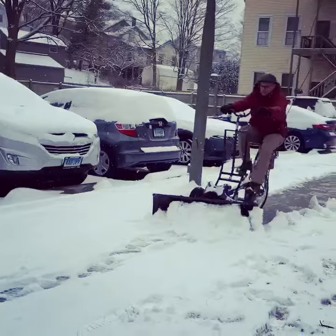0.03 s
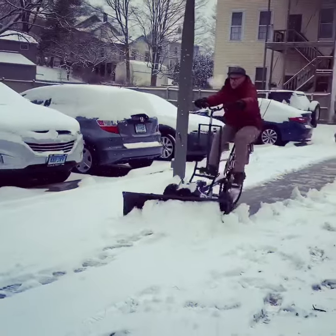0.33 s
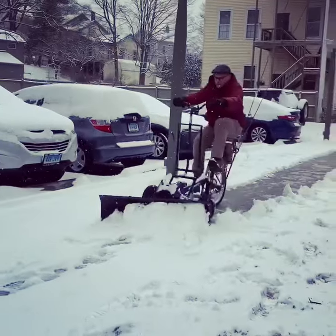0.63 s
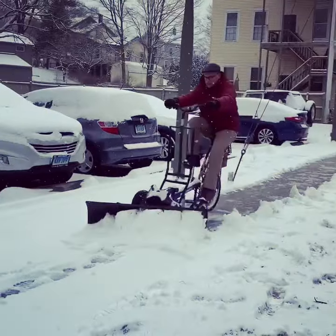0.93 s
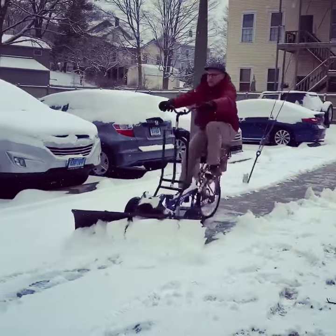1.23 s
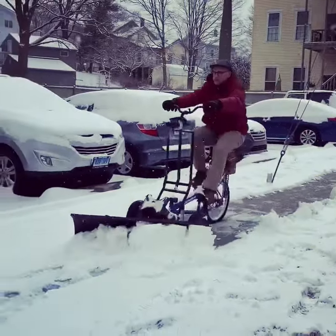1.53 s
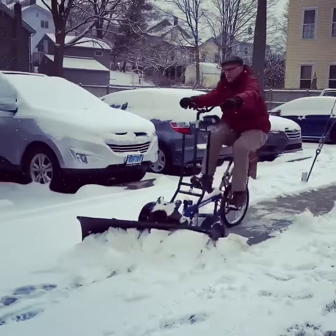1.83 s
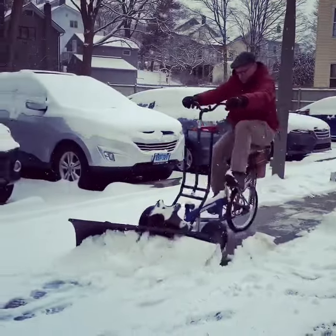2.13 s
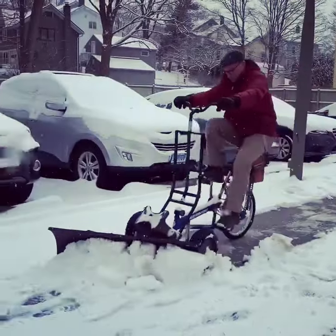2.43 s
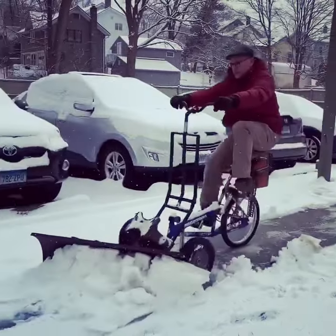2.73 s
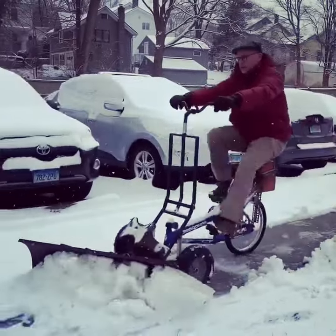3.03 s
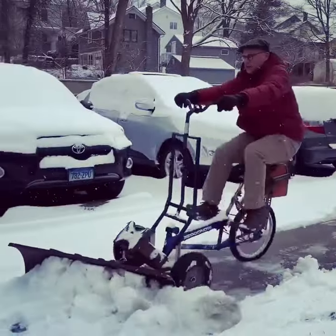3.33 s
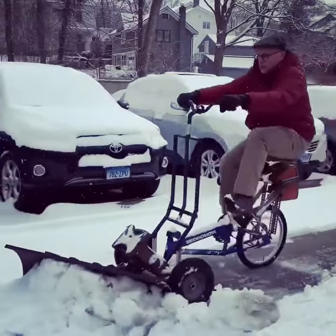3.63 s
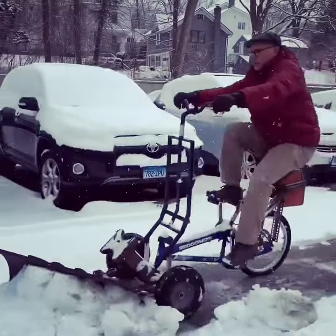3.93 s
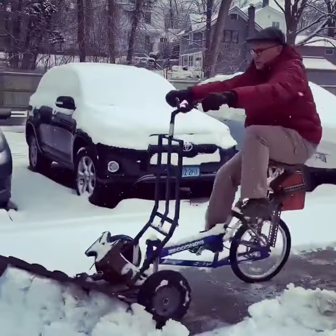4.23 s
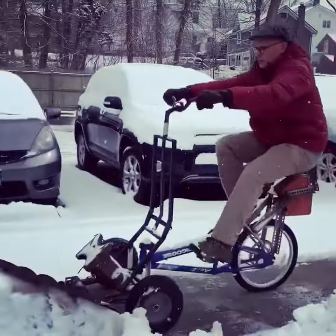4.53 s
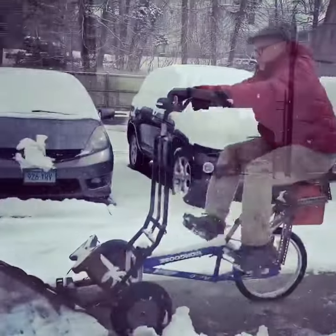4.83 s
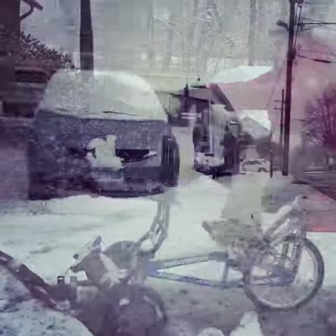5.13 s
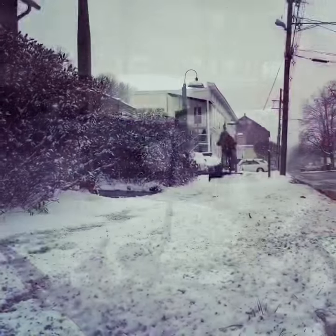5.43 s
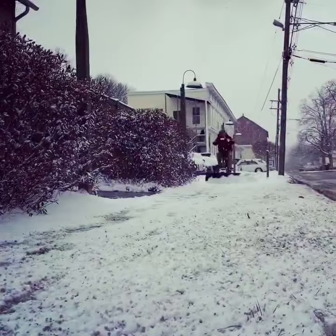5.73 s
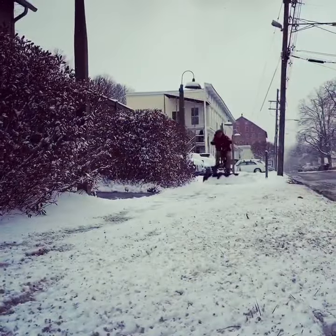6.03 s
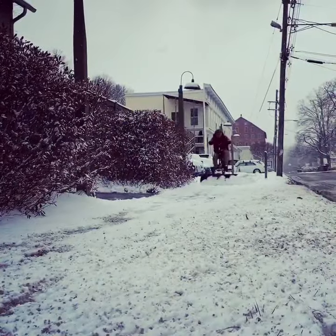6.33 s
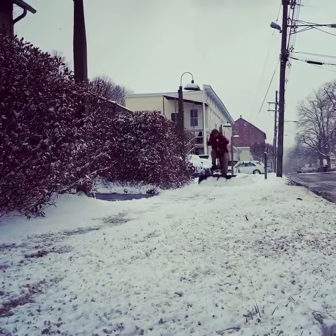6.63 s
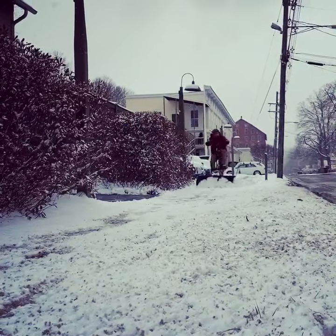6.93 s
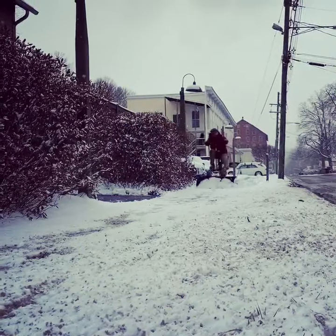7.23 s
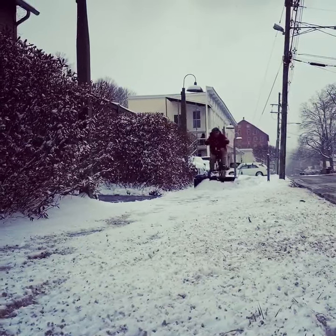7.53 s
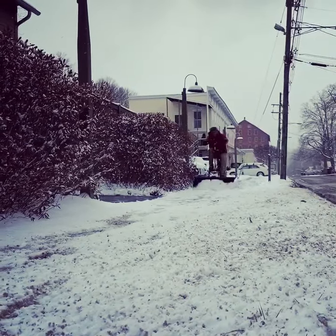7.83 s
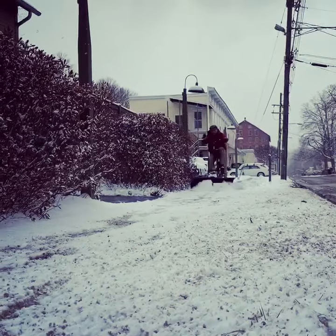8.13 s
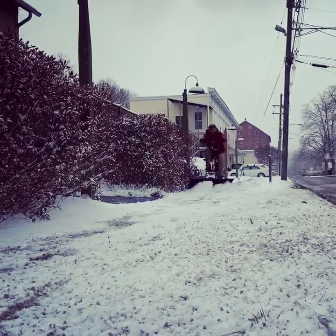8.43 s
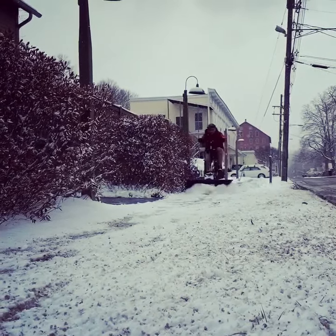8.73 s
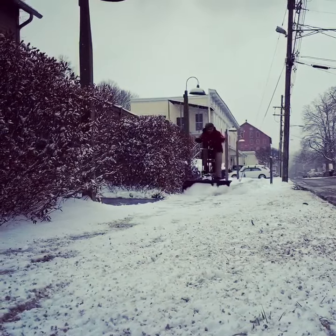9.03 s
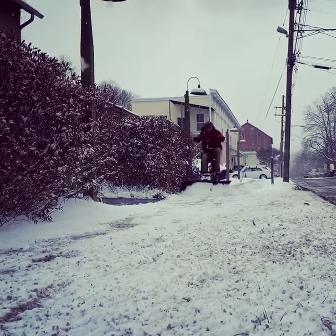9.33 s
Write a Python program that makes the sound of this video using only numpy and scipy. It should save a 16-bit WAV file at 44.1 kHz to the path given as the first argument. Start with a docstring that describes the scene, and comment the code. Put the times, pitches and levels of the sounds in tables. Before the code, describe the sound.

A steel plow blade is pedalled along snowy pavement near the microphone, booming and rasping in uneven surges. Its edge clacks, catches and grates while packed snow crunches, above a low rumble and a faint engine. About halfway the blade goes by and the sound blends into a distant view of the street: an idling hum, soft knocks and a gritty hiss that grows as the plow nears.

```python
"""First a pedal-driven plow pushes snow along a pavement close by, over a low rumble and a faint engine.
With each push its steel blade shudders and booms, its edge scrapes, and the snow crunches and hisses.
Soon grit snaps, and the edge clacks, groans, catches and grates. Just after 4 seconds the blade passes.
Around 5 seconds the sound fades over to the same plow far down the street, where an engine idles.
From there to the end, the plow slowly comes nearer."""
import sys
import numpy as np
from scipy import signal
from scipy.fft import irfft
from scipy.io import wavfile
from scipy.ndimage import uniform_filter1d

SR = 44100
rng = np.random.default_rng(int(sys.argv[2]) if len(sys.argv) > 2 else 0)


def write(x):
    x = np.atleast_2d(x).T
    wavfile.write(sys.argv[1], SR, np.round(np.clip(x, -1, 1) * 32767).astype(np.int16))


N = 422919
T = np.arange(N) / SR
FILTER_HZ = np.fft.rfftfreq(4096, 1 / SR)

# The low rumble of air and street. Each row: time in seconds, level in dB.
RUMBLE_LEVELS = [(0.0, -34), (0.48, -25.5), (0.7, -34), (4.0, -39), (4.5, -33.5), (5.45, -31.5),
                 (6.06, -33.5), (9.59, -48)]
# The tone of each noise. Each row: frequency in Hz, strength in dB.
RUMBLE_TONE = [(10, 14), (25, -20), (50, 25.5), (70, 14), (90, 16), (140, 14.5), (300, -67)]
SCRAPE_TONE = [(300, -34), (600, -13), (950, -7.5), (1200, 1.5), (1600, -3.5), (1900, -2.5), (2350, -7),
               (2800, -3), (3400, -12), (4300, -3), (5300, -8), (7000, -67), (15000, -22)]
SNOW_TONE = [(1500, -25), (3300, -3), (4700, -.5), (5700, -2.5), (6600, 2), (7600, -1), (9100, 2),
             (10500, -.5), (12000, -6), (14000, -9), (15500, -12)]
PASSING_SNOW_TONE = [(1500, -20), (3200, 0), (4800, 2.5), (6000, -.5), (7000, .5), (9000, -3.5),
                     (11000, -2.5), (13000, -6), (15500, -12)]
FAR_SNOW_TONE = [(300, -11), (1000, -1), (1500, -2), (2900, -.5), (4200, -4), (5000, -1.5), (7000, 0),
                 (8500, 0), (9400, -3.5), (10700, -1.5), (12500, -7), (13500, -14), (15500, -19)]
# A faint, fast engine nearby and a slower one down the street. Each row: pitch in Hz, level in dB.
PARKED_ENGINE = [(63, -41), (94.5, -38)]
STREET_ENGINE = [(49.6, -32.5), (74.5, -28.5), (124, -37.5)]
# The blade's low boom, the higher ring of its steel plate, and bright peaks in the far hiss.
# Each row: pitch in Hz, width in Hz (narrow rings longer), strength in dB.
BOOM_NOTES = [(67, 15, -26), (147.2, 40, -6.5), (219.5, 66, 0.5), (291.5, 77, -4.5)]
PLATE_NOTES = [(557, 147, -0.5), (660, 310, -5.5), (725, 137, 1), (796, 35, -7.5)]
FAR_BOOM_NOTES = [(111, 23, -3), (187, 89, 0), (269, 74, -6)]
FAR_PLATE_NOTES = [(381, 160, -5), (516, 100, -1.5), (569, 67, 1.5), (693, 100, -10), (965, 123, -15)]
FAR_HISS_PEAKS = [(2330, 200, -3), (5240, 240, -3), (5620, 240, -2), (6140, 220, 2), (6740, 350, -2),
                  (7380, 220, 0), (8230, 300, -2), (8560, 200, -4)]
# The near blade between pushes. Each row: time in seconds, then boom, ring, scrape and hiss in dB.
GLIDE_LEVELS = [(0.1, -23, -36, -37.5, -40.5), (0.9, -20, -34.5, -37, -41), (1.5, -19, -33, -37, -44),
                (2.3, -21, -35.5, -34.5, -39), (3.3, -20.5, -35.5, -33, -39.5), (4.0, -20, -35.5, -36, -41),
                (4.6, -23.5, -32.5, -31, -37), (4.9, -24, -33.5, -35, -41), (5.5, -24, -31, -34.5, -40)]
# Pedal pushes drive the blade in. Each row: start and length in seconds, extra boom and scrape in dB.
NEAR_PUSHES = [(0.08, 0.21, 6.5, 3), (0.33, 0.26, 5, 3.5), (0.68, 0.4, 2.5, 3), (1.24, 0.36, 4.5, 2.5),
               (1.53, 0.27, 6, 1.5), (1.9, 0.31, 4.5, 1), (2.245, 0.27, 2, 3.5), (2.5, 0.23, 1.5, 2.5),
               (2.69, 0.19, 5.5, 3.5), (3.02, 0.22, 8, 5), (3.4, 0.24, 5, 6), (3.61, 0.45, 5.5, 3.5),
               (4.12, 0.29, 4, 1), (4.33, 0.52, 8, 2.5), (4.97, 0.12, 8, 3.5)]
# The scraping edge sings. Each row: time in seconds, lower and upper pitch in Hz.
EDGE_PITCHES = [(0.12, 1450, 1920), (0.99, 1350, 1920), (1.93, 1350, 1720), (2.52, 1480, 1850),
                (3.3, 1330, 2030), (3.5, 1390, 2100), (4.08, 1400, 2200), (4.61, 1350, 2280),
                (5.2, 1440, 2330)]
# Grit snaps. Each row: start in seconds, peak in dB, pitch in Hz, fade time in milliseconds.
GRIT_SNAPS = [(0.177, -16, 8350, 3.3), (1.025, -20, 7500, 3), (1.391, -18, 9100, 4),
              (1.4818, -16, 9050, 4.7), (1.623, -15, 9700, 3.6), (1.779, -19.5, 9370, 2.8),
              (1.847, -18, 9050, 3), (2.502, -15, 8860, 2.9), (2.956, -21, 9100, 2.7),
              (3.148, -16, 9670, 3), (3.259, -15, 8450, 5.9), (3.582, -16.5, 7600, 2),
              (3.643, -16, 7190, 2), (3.668, -13, 7200, 1.4), (3.952, -16, 8250, 6),
              (6.195, -22, 7310, 1.7), (6.745, -21, 7280, 2), (7.59, -19, 7310, 3.6),
              (8.276, -20, 7310, 1.5), (8.472, -16, 6300, 3.2), (9.1028, -18, 7380, 2),
              (9.5555, -17, 6060, 4)]
# The edge hits a joint or stone, catches, or tears over a rough spot.
# Each row: start in seconds, level in dB.
EDGE_CLACKS = [(0.301, -14), (0.346, -18), (0.879, -13.5), (1.026, -14), (1.082, -18.5), (1.146, -18),
               (1.228, -14), (1.847, -18.5), (2.261, -13.5), (2.723, -15), (4.8, -18), (6.05, -26),
               (7.153, -24), (7.265, -30), (7.338, -35)]
BLADE_KNOCKS = [(0.684, -12), (2.202, -5), (2.358, -6.5), (2.516, -13), (4.056, -4), (4.196, -9),
                (6.087, -12), (7.375, -10), (7.997, -13), (8.202, -16), (8.967, -9)]
EDGE_GRATES = [(1.618, -17), (1.979, -21), (2.283, -19), (2.383, -20), (2.483, -18.5), (2.635, -18.5),
               (2.815, -19.5), (3.435, -18.5), (3.638, -20)]
# Packed snow breaks, or the blade hops clear. Each row: start and length in seconds, hiss change in dB.
SNOW_CRUNCHES = [(0.45, 0.12, 2.5), (0.72, 0.26, 2.5), (1.24, 0.32, 6), (1.58, 0.2, 5), (1.91, 0.29, 2.5),
                 (3.09, 0.087, 3), (3.425, 0.13, 6), (3.77, 0.24, 4), (3.93, 0.11, 5.5), (4.42, 0.37, 1),
                 (6.12, 0.072, 2.5), (7.81, 0.17, 3), (9.25, 0.064, 4), (9.42, 0.055, 6)]
BLADE_HOPS = [(2.16, 0.1, -8), (5.09, 0.11, -1), (6.6, 0.11, -2.5), (8.22, 0.08, -3)]
# The blade groans. Each row: start and length in seconds, first and last pitch in Hz, level in dB.
BLADE_GROANS = [(0.616, 0.83, 715, 715, -35.5), (0.78, 0.28, 557, 570, -35), (1.26, 0.44, 252, 202, -18),
                (1.9, 0.2, 1290, 1230, -35), (1.97, 0.18, 236, 207, -16), (2.299, 0.55, 1490, 1400, -34.5),
                (2.682, 0.18, 293, 296, -22.5), (3.04, 0.18, 236, 210, -20.5),
                (3.2, 0.32, 1260, 1180, -34.5), (3.46, 0.56, 257, 199, -23), (3.65, 1.21, 1170, 1190, -37),
                (4.147, 0.21, 650, 654, -34), (4.35, 0.47, 194.3, 218.3, -17.5),
                (4.567, 0.44, 746, 727, -33.5), (4.76, 0.44, 1490, 1430, -39),
                (5.548, 0.585, 334, 343, -36.5), (7.2, 0.28, 504, 520, -40)]
# Pushes far away. Each row: start and length in seconds, extra boom, ring and hiss in dB.
DISTANT_PUSHES = [(5.6, 0.23, 3.5, 1, 3), (6.21, 0.18, 3, 1, 3), (6.7, 0.15, 4, 2.5, 0.5),
                  (7.11, 0.19, 4, 6.5, 2.5), (7.31, 0.24, 2, 4, 1.5), (7.5, 0.23, 4.5, 3, 2),
                  (7.84, 0.26, 1, 3.5, 0.5), (8.6, 0.46, 3, 2.5, 3), (9.07, 0.17, 2, 4.5, 5),
                  (9.5, 0.2, 0, 4.5, 2.5)]
# How far the left side runs ahead of the right. Each row: frequency in Hz, lead in radians.
NEAR_LEFT_LEAD = [(0, 0), (300, .06), (1000, .95), (1400, .2), (2000, .3), (4000, 2.2), (5900, 3.14),
                  (11300, 9.42), (15700, 14.5)]
FAR_LEFT_LEAD = [(0, 0), (300, .06), (450, .35), (1250, -.8), (2500, 1.1), (3600, 1.8), (4800, 3.14),
                 (15200, 18.5)]
# How much louder the left side is, close by. Each row: frequency in Hz, extra level in dB.
NEAR_LEFT_BOOST = [(60, -1), (120, 0.5), (240, 0.5), (480, 1.4), (950, 2), (1890, 0)]
# How alike the two sides are. Each row: frequency in Hz, likeness from 0 to 1.
SIDE_LIKENESS = [(250, .999), (600, .97), (1800, .88), (2600, .76), (4000, .82), (5000, .985), (11500, .98),
                 (15000, .92)]

# Each pair: start and end in seconds.
FADE_IN, DRAWS_LEVEL, TURNS_AWAY = (0.036, 0.09), (3.2, 4.301), (4.8, 5.399)
ENGINE_IN, NEAR_TO_FAR = (4.7, 6.2), (4.84, 5.605)
# The far blade between pushes. Each pair: dB at the end of NEAR_TO_FAR, dB gained per second.
FAR_BOOM_RISE, FAR_RING_RISE, FAR_HISS_RISE = (-26.5, 1), (-42, 0.68), (-47.5, 2.02)


def amp(db):
    """Turns decibels into a number to multiply by."""
    return np.exp(np.asarray(db) * (np.log(10) / 20))


def evened(x):
    """Scales a signal so its average level (rms) is 1."""
    return x / np.sqrt(np.mean(x ** 2) + 1e-20)


def curves(rows):
    """Joins the dots of a table over time, one curve per column."""
    s, *columns = np.transpose(rows)
    return [np.interp(T, s, column) for column in columns]


def by_frequency(rows):
    """Joins the dots of a table over frequency, with octaves evenly spaced."""
    hz, value = np.transpose(rows)
    return np.interp(np.log(FILTER_HZ + 1), np.log(hz + 1), value)


def add(mix, s, sound):
    """Adds a sound to the mix, starting at s seconds."""
    part = mix[max(round(s * SR), 0):][:len(sound)]
    part += sound[:len(part)]


def peaks(notes):
    """A filter shape with a steep peak at each ringing note."""
    powers = (amp(db) ** 2 / (1 + (2 * (FILTER_HZ - hz) / width) ** 2) ** 2 for hz, width, db in notes)
    return np.sqrt(sum(powers))


def colour(x, gain):
    """Filters a sound so that each hit rings after it lands, never before."""
    log_gain = np.log(np.maximum(np.r_[gain, gain[-2:0:-1]], 1e-5))
    taps = np.fft.ifft(np.exp(np.conj(signal.hilbert(log_gain)))).real
    return signal.oaconvolve(x, taps[None], axes=1)[:, :N]


def wander(rate):
    """A random curve that turns about rate times a second."""
    knots = rng.standard_normal(8000)
    return evened(np.interp(T * rate, np.arange(len(knots)), knots))


def grains(per_s, spread_db):
    """Two streams of random clicks of uneven size."""
    size, chance = rng.random((2, 2, N), dtype=np.float32)
    hit, out = chance < per_s / SR, np.zeros((2, N))
    sign = np.where(chance[hit] < .5 * per_s / SR, 1, -1)
    out[hit] = sign * amp(spread_db * np.minimum(-np.log1p(-size[hit]), 4))
    return evened(out)


def clumps(per_s, decay_ms, size):
    """A loudness curve for snow giving way in lumps: each jumps up and dies away."""
    starts = np.minimum(rng.exponential(1, N), 2.4) ** 2 * (rng.random(N) < per_s / SR)
    lumps = signal.lfilter([1], [1, -np.exp(-1000 / (decay_ms * SR))], starts)
    return np.sqrt(1 + abs(size * uniform_filter1d(lumps, size=150)))


def stereo(pair, lead, boost=((0, 0),)):
    """Makes left and right: both share the first signal, and the second sets them apart."""
    same = np.clip(by_frequency(SIDE_LIKENESS), -1, 1)
    tilt = amp(by_frequency(boost) / 2) * np.exp(.5j * np.interp(FILTER_HZ, *np.transpose(lead)))
    common, apart = np.sqrt((1 + same) / 2), np.sqrt((1 - same) / 2)
    gains = np.array([[common * tilt, apart * tilt], [common / tilt, -apart / tilt]])
    taps = np.fft.fftshift(irfft(gains), axes=-1)
    return signal.oaconvolve(pair[None], taps, axes=2).sum(1)[:, taps.shape[2] // 2:][:, :N]


def steady(x, band_hz, size=4000, channels=2):
    """Keeps the level inside one band near 1, so a curve can set the loudness later."""
    band = signal.sosfilt(signal.butter(3, band_hz, "bandpass", fs=SR, output="sos"), x[:channels].mean(0))
    power = uniform_filter1d(uniform_filter1d(band ** 2, size), size // 2)
    return x / np.sqrt(abs(power) + 1e-14)


def resonate(x, hz, width):
    """Makes a sound ring at hz, which is one pitch or a sliding curve."""
    turn = np.exp(2j * np.pi * np.cumsum(np.broadcast_to(hz, x.shape[-1])) / SR)
    decay = np.exp(-np.pi * width / SR)
    return 2 * (turn * signal.lfilter([1 - decay], [1, -decay], x / turn)).real


def struck(notes, t):
    """Steel after one hit: its notes ring together and die away."""
    ring = sum((-1) ** k * amp(db) * np.sin(2 * np.pi * hz * t) * np.exp(-np.pi * width * t)
               for k, (hz, width, db) in enumerate(notes))
    return ring / abs(ring).max()


def echoes(x, share, drift_ms):
    """Short echoes off the frame and ground shift as the plow moves."""
    out = x.copy()
    for delay_ms in np.geomspace(1.3, 11, 6):
        late = T - (delay_ms + drift_ms * wander(rate=1.5)) / 1000
        out += share * rng.choice([-1, 1]) * x.take((late * SR).astype(int), axis=1, mode="clip")
    return out


def street_rumble():
    """Air and street make a deep noise that swells and sinks."""
    level_db, = curves(RUMBLE_LEVELS)
    return amp(level_db) * evened(colour(rng.standard_normal((1, N)), amp(by_frequency(RUMBLE_TONE))))


def engine_hum(tones):
    """An idling engine hums a few low, slightly wavering tones."""
    return sum(amp(db + 0.39 * wander(rate=6.4)) * np.sqrt(2)
               * np.sin(2 * np.pi * hz * T + 0.082 * wander(rate=3.14)) for hz, db in tones)


def blade_boom(jolt):
    """Many tiny jolts keep the blade's low notes booming."""
    boom = colour(grains(per_s=700, spread_db=0.5) * amp(2 * jolt), peaks(BOOM_NOTES))
    return steady(boom, band_hz=(130, 380), size=2400, channels=1)


def plate_ring(jolt):
    """Jolts ring the steel plate, and the changing load of snow bends all its notes together."""
    ring = colour(grains(per_s=1500, spread_db=4) * amp(1.1 * jolt), peaks(PLATE_NOTES))
    shift = signal.lfilter([1], [1, -np.exp(-2 / SR)], .035 * wander(rate=9))  # samples early or late
    bent = np.array([np.interp(np.arange(N) + shift, np.arange(N), side) for side in ring])
    return steady(echoes(bent, share=.23, drift_ms=.2), band_hz=(480, 880), channels=1)


def edge_scrape(jolt):
    """The edge rasps through grit and sings at two rough pitches that slide with the load."""
    lower_hz, upper_hz = curves(EDGE_PITCHES)
    rasp = grains(per_s=12000, spread_db=1.5) * amp(1.2 * jolt)
    rasp *= clumps(per_s=100, decay_ms=6.2, size=.5) ** 0.9
    singing = 1.1 * resonate(rasp, lower_hz + 85 * wander(rate=13), width=190)
    singing += 0.93 * resonate(rasp, upper_hz + 150 * wander(rate=13), width=440)
    scrape = colour(0.86 * rasp + singing, amp(by_frequency(SCRAPE_TONE)))
    scrape = echoes(scrape, share=.23, drift_ms=.2)
    return steady(stereo(scrape, NEAR_LEFT_LEAD, NEAR_LEFT_BOOST), band_hz=(1050, 3000))


def snow_hiss(jolt):
    """Crumbling snow makes countless clicks, a hiss whose tone changes as the blade passes."""
    crunch = clumps(per_s=76, decay_ms=5.1, size=.6) * amp(wander(rate=12))
    clicks = grains(per_s=17000, spread_db=5) * amp(0.62 * jolt) * crunch
    beside, gone = np.interp(T, DRAWS_LEVEL, [0, 1]), np.interp(T, TURNS_AWAY, [0, 1])
    hiss = (1 - beside) * colour(clicks, amp(by_frequency(SNOW_TONE)))
    hiss += beside * colour(clicks, amp(by_frequency(PASSING_SNOW_TONE)))
    hiss = (1 - gone) * hiss + gone * uniform_filter1d(hiss, size=3)  # the blade blocks its own treble
    hiss = echoes(hiss, share=.23, drift_ms=.2)
    return steady(stereo(hiss, NEAR_LEFT_LEAD), band_hz=(6800, 10300), size=8000)


def surges(rows, rise_s=0.044, fall_s=0.089):
    """Each surge builds, holds and lets go. Gives one curve per dB column."""
    out = np.zeros((N, len(rows[0]) - 2))
    for s, length, *extra_db in rows:
        t = np.arange(0, length, 1 / SR)
        shape = np.minimum(t / rise_s, 1) * np.minimum((length - t) / fall_s, 1)
        add(out, s, np.outer(shape, extra_db))
    return out.T


def near_plow():
    """The blade sticks and slips. The same jolts drive boom, ring, scrape and hiss; pushes swell them."""
    boom_db, ring_db, scrape_db, hiss_db = curves(GLIDE_LEVELS)
    push_boom_db, push_scrape_db = surges(NEAR_PUSHES)
    ridges = wander(rate=17)  # the snow lies unevenly
    load_db, stuck_db = snow_load(), sticking()
    boom_db += push_boom_db + 1.42 * wander(rate=19)
    ring_db += 0.96 * push_scrape_db + stuck_db + 1.8 * ridges
    scrape_db += push_scrape_db + 0.29 * load_db + stuck_db + 0.86 * ridges
    hiss_db += 0.043 * push_boom_db + 0.033 * push_scrape_db + load_db + 1.8 * ridges
    jolt = wander(rate=51)
    blade = amp(boom_db) * blade_boom(jolt) + amp(ring_db) * plate_ring(jolt)
    blade = stereo(blade, NEAR_LEFT_LEAD, NEAR_LEFT_BOOST)
    return blade + amp(scrape_db) * edge_scrape(jolt) + amp(hiss_db) * snow_hiss(jolt)


def grit_snaps():
    """Grit cracks under the edge in tiny, bright bursts."""
    out, t = np.zeros(N), np.arange(3000) / SR
    for s, db, hz, decay_ms in GRIT_SNAPS:
        burst = rng.standard_normal(len(t)) * np.exp(-t * 1000 / decay_ms)
        snap = resonate(burst, hz, width=2600)
        add(out, s, amp(db) * snap / abs(snap).max())
    return out


def sticking(stick_s=0.013, dip_db=-2):
    """The edge sticks just before each clack or grate. Gives the brief dip in dB."""
    dips = [(s - stick_s, stick_s, dip_db) for s, _ in EDGE_CLACKS + EDGE_GRATES]
    return surges(dips, rise_s=stick_s / 2, fall_s=stick_s / 10)[0]


def clacks():
    """The edge hits a joint or stone: the plate rings, with a scuff and a sharp crack."""
    out, t = np.zeros(N), np.arange(3000) / SR
    for s, db in EDGE_CLACKS:
        scuff = resonate(rng.standard_normal(len(t)) * np.exp(-t / 0.0038), hz=1500, width=1100)
        crack = rng.standard_normal(len(t)) * np.exp(-t / 0.0027)
        clack = 0.7 * struck(PLATE_NOTES, t) + 0.7 * scuff / abs(scuff).max() + .14 * crack
        add(out, s, amp(db) * clack)
    return out


def snow_load():
    """The hiss rises as packed snow breaks and drops as the blade hops clear. Gives the change in dB."""
    crunch_db = surges(SNOW_CRUNCHES, rise_s=0.011, fall_s=0.077)[0]
    return crunch_db + surges(BLADE_HOPS, rise_s=0.013, fall_s=0.0079)[0]


def groans(sharpness=9.7, fade_s=0.048):
    """Dragging keeps one note of the blade sounding; its pitch slides and wavers with the load."""
    out, waver = np.zeros(N), 1 + 0.0071 * wander(rate=9)
    for s, length, start_hz, end_hz, db in BLADE_GROANS:
        t = np.arange(0, length, 1 / SR)
        pitch = np.linspace(start_hz, end_hz, len(t)) * np.interp(s + t, T, waver)
        width = start_hz / sharpness
        ring = resonate(resonate(rng.standard_normal(len(t)), pitch, width), pitch, width)
        ring /= np.sqrt(abs(uniform_filter1d(ring ** 2, size=2000)) + 1e-14)  # rubbing keeps it steady
        fade = np.minimum(np.minimum(t, length - t) / fade_s, 1)
        add(out, s, amp(db) * evened(ring * fade))
    return out


def knocks():
    """The blade catches hard on the pavement, and its low notes boom."""
    out, t = np.zeros(N), np.arange(3000) / SR
    for s, db in BLADE_KNOCKS:
        add(out, s, amp(db) * struck(BOOM_NOTES, t))
    return out


def hits(top_hz):
    """All the snaps, clacks and knocks, softened above top_hz."""
    return signal.sosfilt(signal.butter(4, top_hz, fs=SR, output="sos"), grit_snaps() + clacks() + knocks())


def grates():
    """The edge tears free of a rough spot: a short squawk at its singing pitch, with a spray of grit."""
    out, t = np.zeros(N), np.arange(3000) / SR
    edge_hz, _ = curves(EDGE_PITCHES)
    for s, db in EDGE_GRATES:
        grit = rng.standard_normal(len(t)) * t * np.exp(-t / 0.0048)
        squawk = resonate(grit, np.interp(s, T, edge_hz), width=270) + 0.02 * grit
        add(out, s, amp(db) * squawk / abs(squawk).max())
    return out


def far_hiss(jolt):
    """From far away, the scraping through snow is mostly a gritty, uneven hiss."""
    crunch = clumps(per_s=100, decay_ms=3.9, size=.55)
    clicks = grains(per_s=14000, spread_db=3) * amp(1.25 * jolt + 0.38 * wander(rate=18)) * crunch
    clicks = evened(clicks) + 0.1 * grains(per_s=80, spread_db=-5)  # single crumbs of ice crack
    hiss = colour(clicks, np.hypot(amp(by_frequency(FAR_SNOW_TONE)), 1.19 * peaks(FAR_HISS_PEAKS)))
    distant = np.interp(T, [NEAR_TO_FAR[1], 8.8], [.85, .2])
    hiss = (1 - distant) * hiss + distant * uniform_filter1d(hiss, size=3)  # distance dulls the treble
    hiss = echoes(hiss, share=.17, drift_ms=.15)
    return steady(stereo(hiss, FAR_LEFT_LEAD), band_hz=(5500, 8300), size=8000)


def far_plow():
    """The far blade booms and rings more dully under its hiss. All three grow as it nears."""
    nearing_s = T - NEAR_TO_FAR[1]
    rises = FAR_BOOM_RISE, FAR_RING_RISE, FAR_HISS_RISE
    glide_db = np.array([db + db_per_s * nearing_s for db, db_per_s in rises])
    boom_db, ring_db, hiss_db = glide_db + surges(DISTANT_PUSHES) + 0.3 * wander(rate=16)
    jolt = wander(rate=37)
    boom = colour(grains(per_s=900, spread_db=3) * amp(2.8 * jolt), peaks(FAR_BOOM_NOTES))
    ring = colour(grains(per_s=1100, spread_db=4) * amp(1.7 * jolt), peaks(FAR_PLATE_NOTES))
    blade = amp(boom_db) * steady(boom, band_hz=(110, 330), size=3000, channels=1)
    blade += amp(ring_db) * steady(ring, band_hz=(400, 700), channels=1)
    return stereo(blade, FAR_LEFT_LEAD) + amp(hiss_db + snow_load()) * far_hiss(jolt)


def scene():
    """The near plow fades in, then gives way to the far one. The street rumbles throughout."""
    groaning, silence = groans(), np.zeros(N)
    near_events = np.array([hits(top_hz=15000) + grates() + groaning, silence])
    near = near_plow() + stereo(near_events, NEAR_LEFT_LEAD, NEAR_LEFT_BOOST) + engine_hum(PARKED_ENGINE)
    far_events = np.array([hits(top_hz=12000) + groaning, silence])
    far = far_plow() + stereo(far_events, FAR_LEFT_LEAD)
    street = street_rumble() + np.interp(T, ENGINE_IN, [0, 1]) * engine_hum(STREET_ENGINE)
    blend = np.interp(T, NEAR_TO_FAR, [0, 1])
    return np.interp(T, FADE_IN, [0, 1]) * ((1 - blend ** 2) * near + blend * far + street)


def record(dry):
    """Rounds off the loudest peaks, then cuts the treble above 15750 Hz."""
    rounded = dry / (1 + (dry / .92) ** 8) ** (1 / 8)
    treble_cut = signal.firwin(511, 15750, window=("kaiser", 9), fs=SR)
    return signal.oaconvolve(rounded, treble_cut[None], "same")


dry = scene()
out = record(dry)
write(out)
```